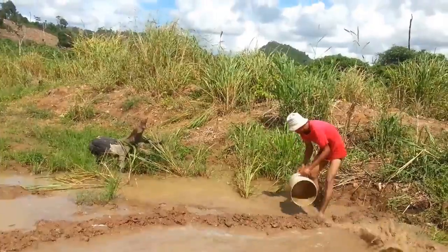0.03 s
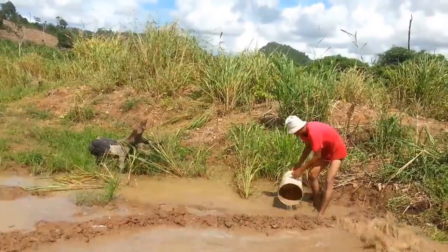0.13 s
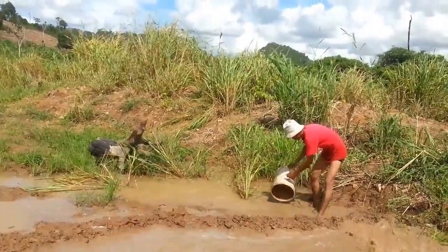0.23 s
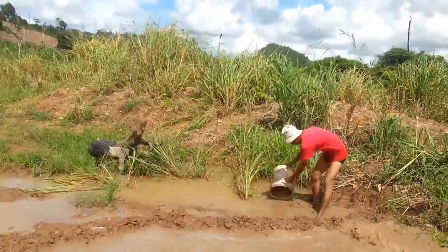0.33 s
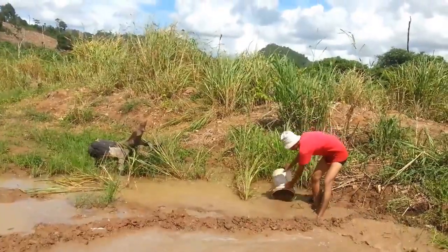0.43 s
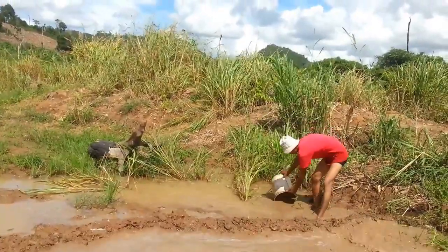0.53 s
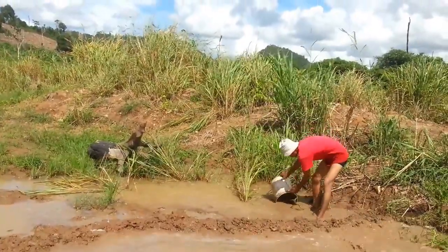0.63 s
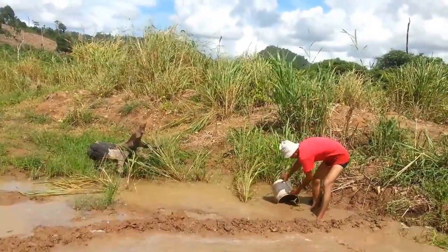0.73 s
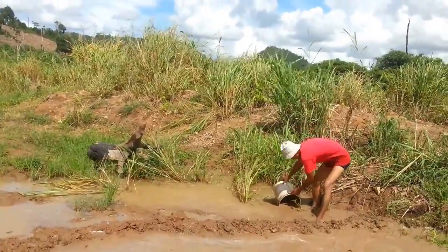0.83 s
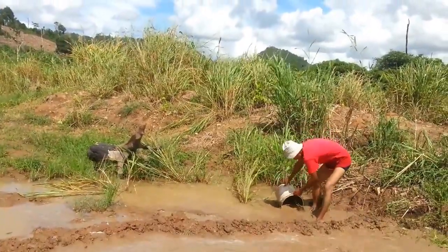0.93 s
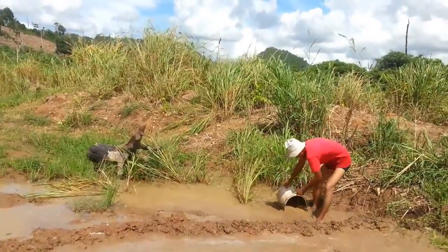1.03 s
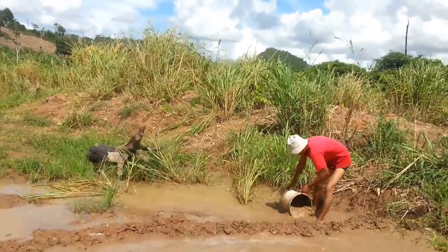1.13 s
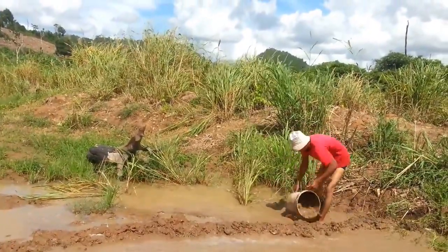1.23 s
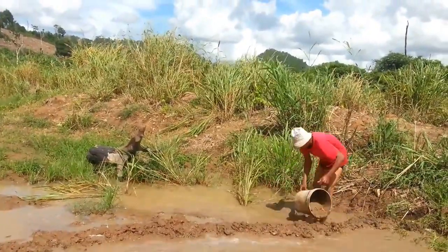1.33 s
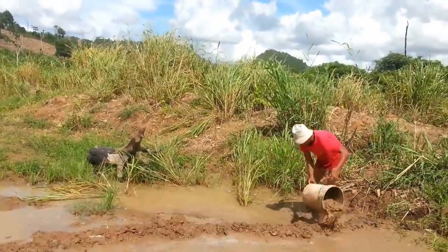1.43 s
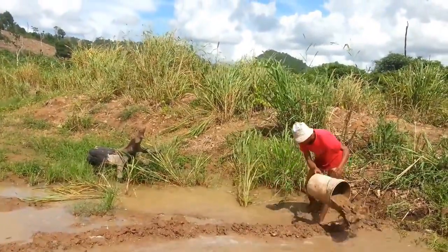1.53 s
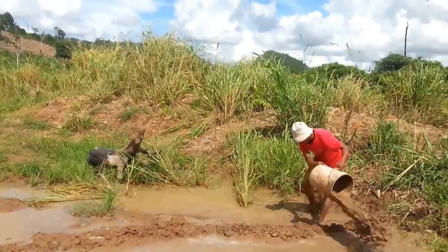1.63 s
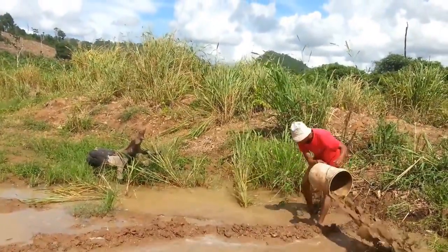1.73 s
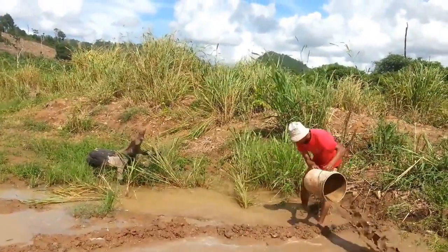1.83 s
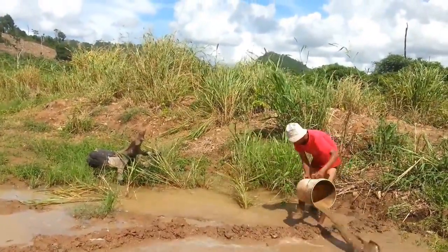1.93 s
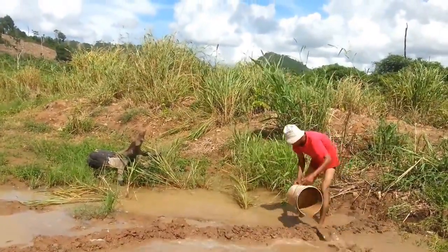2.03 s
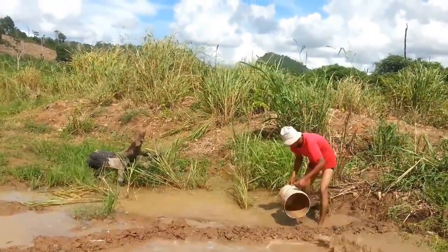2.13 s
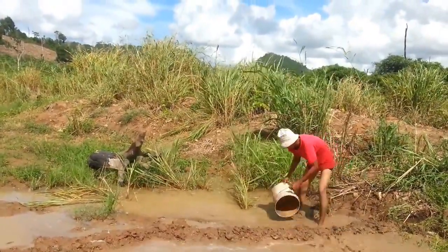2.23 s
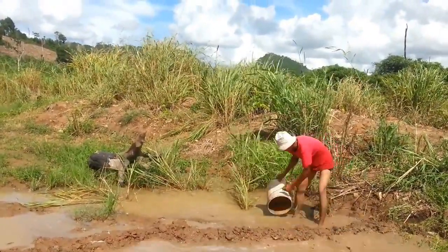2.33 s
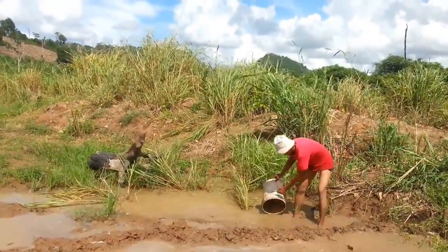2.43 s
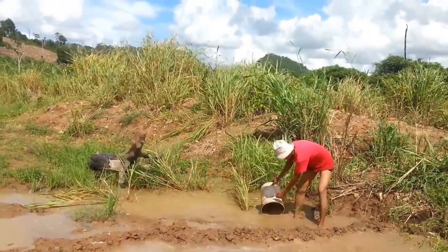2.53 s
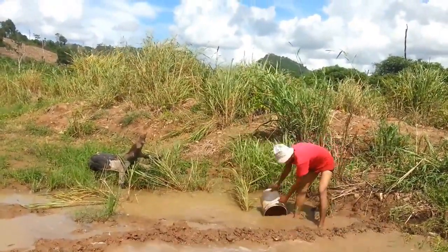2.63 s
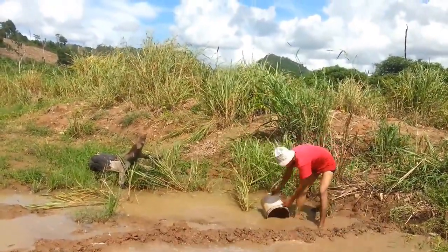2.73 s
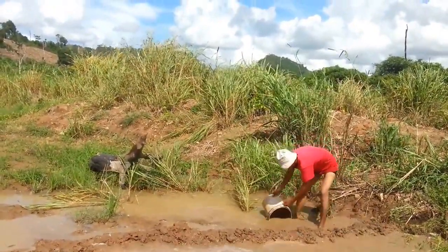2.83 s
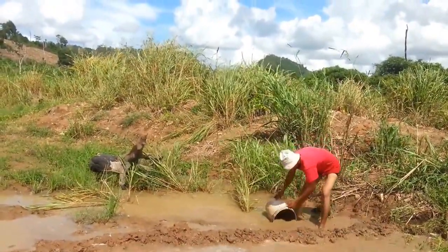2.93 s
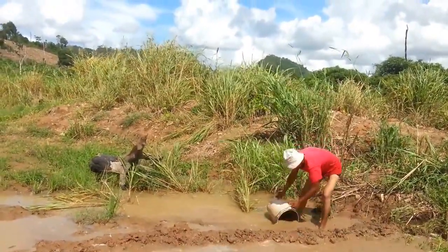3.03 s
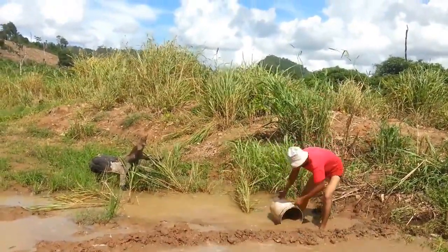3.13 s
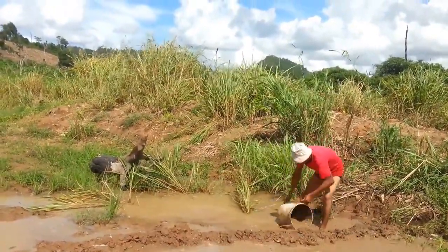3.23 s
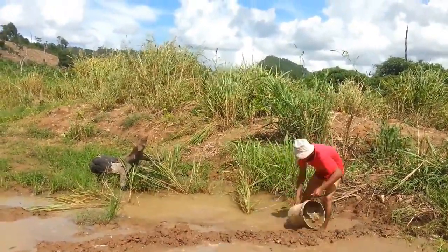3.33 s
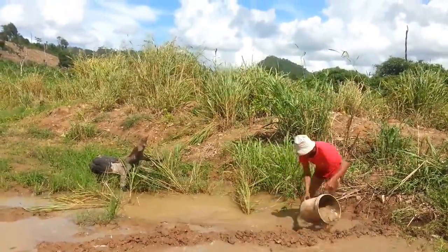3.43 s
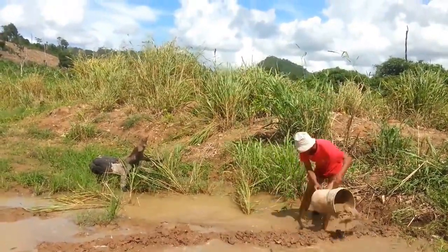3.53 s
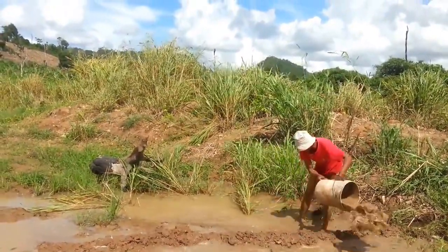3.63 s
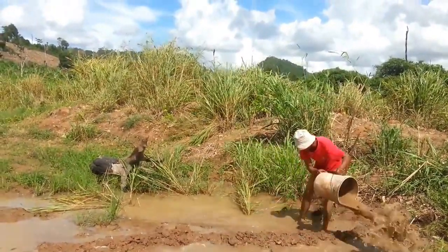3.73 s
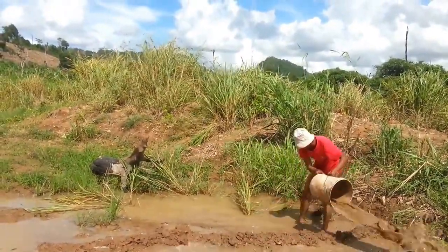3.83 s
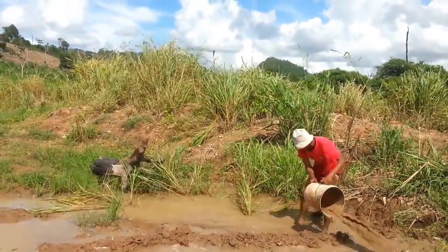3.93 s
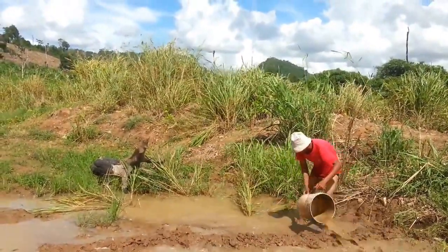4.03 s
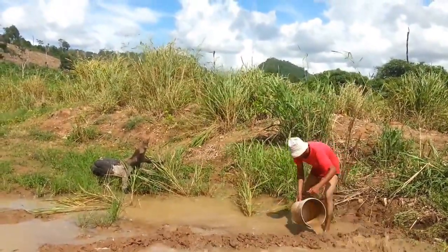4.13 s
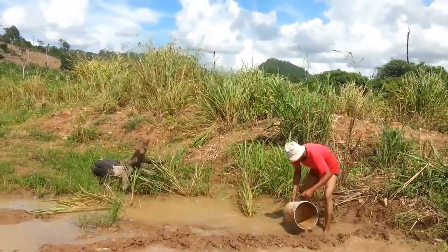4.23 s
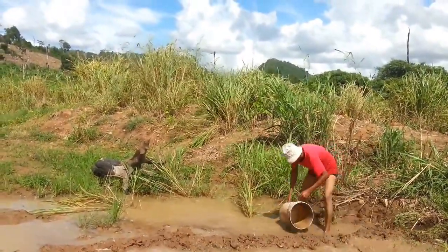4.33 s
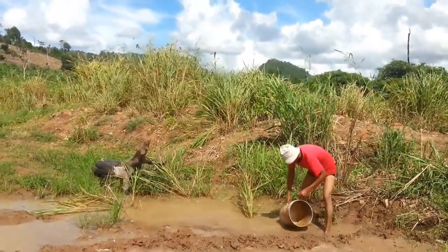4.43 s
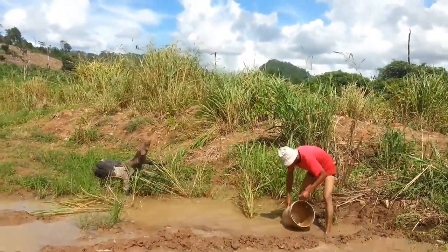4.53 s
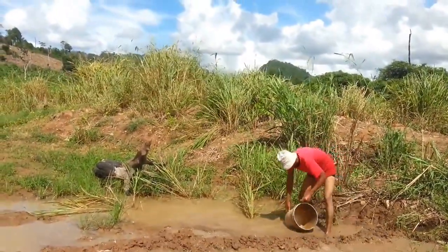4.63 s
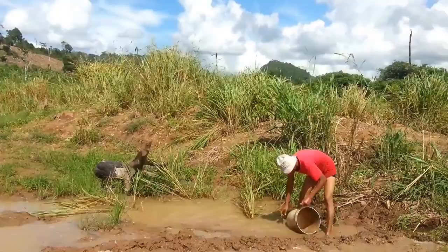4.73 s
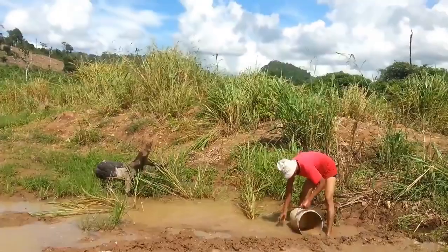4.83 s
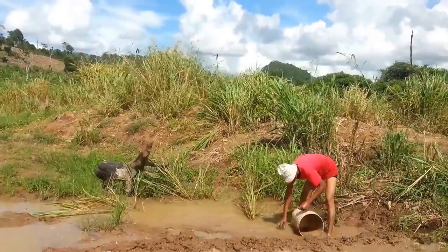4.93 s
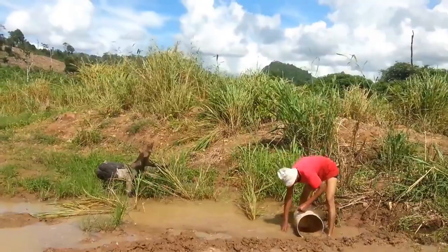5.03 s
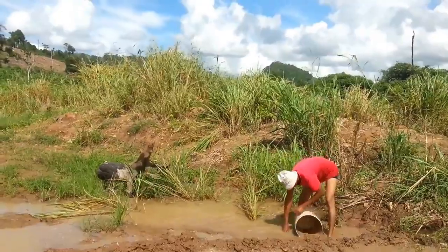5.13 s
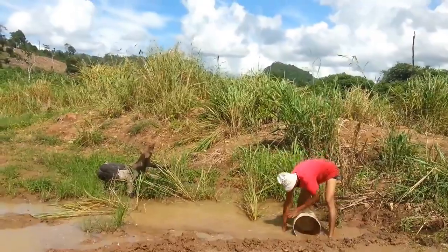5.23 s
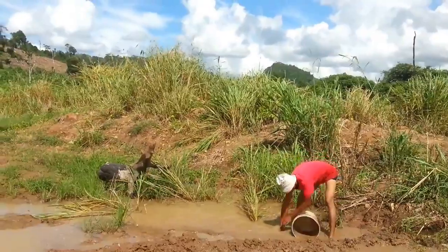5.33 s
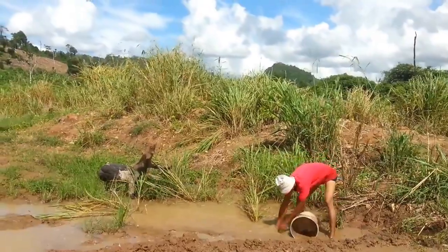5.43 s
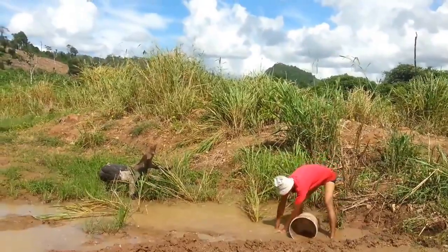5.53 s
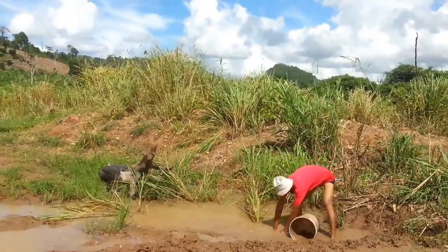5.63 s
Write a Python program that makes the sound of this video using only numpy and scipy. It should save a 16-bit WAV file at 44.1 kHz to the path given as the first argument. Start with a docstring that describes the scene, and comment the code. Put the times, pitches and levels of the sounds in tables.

```python
"""A plastic bucket scoops muddy water from a shallow ditch and throws it onto a flooded field three times.
The first throw lands at once, the others near 1.9 and 4.1 s: random bubbles, noise and plops, then run-off.
Falling sine notes of two birds come at 0.8 s and, lower, at 4.8 s; an insect's pulsed noise buzzes from 5.1 s.
Sloshes, drips and a trickle fill the gaps, over filtered noise for the field's hiss and a low rumble.
Two microphone ports on opposite faces of a small camera hear it with their own colour and lag."""
import sys
import numpy as np
from scipy import signal
from scipy.fft import rfft, irfft, next_fast_len
from scipy.io import wavfile
from scipy.ndimage import uniform_filter1d, map_coordinates

SR = 44100
rng = np.random.default_rng(int(sys.argv[2]) if len(sys.argv) > 2 else 0)


def unload_audio(sound):
    """Save the sound as a 16-bit wav file, at the path given as the first command line argument."""
    columns = np.transpose(np.atleast_2d(sound))
    # keep every value between -1 and 1, then stretch to whole-number steps
    steps = np.round(np.clip(columns, -1, 1) * 32767)
    wavfile.write(sys.argv[1], SR, steps.astype(np.int16))


def attenuation_scalar(level_db):
    """Turn a level in dB into a linear amplitude multiplier (20 dB per decade)."""
    decades = np.asarray(level_db, float) / 20
    return 10 ** decades


N = 250488  # length [samples]
TIME = np.arange(N) / SR  # [s]
# Source levels below are those before the ports and the camera body colour them.


def unit(x):
    """Normalisation: the signal is scaled to rms 1."""
    return x / np.sqrt(np.mean(x ** 2) + 1e-20)


def along(points, hz, axis=1):
    """Logarithmic frequency scale: one column of a table is interpolated along it."""
    table = np.transpose(points)
    return np.interp(np.log(hz + 1), np.log(table[0] + 1), table[axis])


def filtered(x, response):
    """Linear filtering: the spectrum is multiplied by a complex response of frequency."""
    size = next_fast_len(N + 8192)
    spectrum = rfft(x, size) * response(np.fft.rfftfreq(size, 1 / SR))
    return irfft(spectrum, size)[..., :N]


def band(hz, low_hz, high_hz):
    """Band-pass response: the gain falls smoothly beyond each edge."""
    return 1 / np.sqrt((1 + (low_hz / (hz + 1)) ** 6) * (1 + (hz / high_hz) ** 6))


def swell(peak_s, rise_s, fade_s):
    """Exponential growth and decay: dB climb 20 in rise_s up to the peak and drop 20 in fade_s after it."""
    late = TIME - peak_s
    return -20 * np.maximum(late / fade_s, -late / rise_s)


def bubbles(start, hz, size, cycles, rise, count, swell=7.9):
    """Bubble resonance: air pockets swell, ring with rising pitch and die away.

    Row two is the same ring a quarter turn away; count is the length in samples."""
    t = np.arange(count) / SR
    age = t * (hz / cycles)[:, None]
    start_turn = rng.random((len(hz), 1))
    phase = 2 * np.pi * (hz[:, None] * t * (1 + rise * np.minimum(age, 3) / 2) + start_turn)
    envelope = size[:, None] * (1 - np.exp(-swell * age)) * np.exp(-age * np.sqrt(age))
    flip = rng.choice([-1, 1], (len(hz), 1))
    where = (np.round(start * SR).astype(int)[:, None] + np.arange(count)).ravel()
    waves = (np.sin(phase), flip * np.cos(phase))
    return np.array([np.bincount(where, (envelope * wave).ravel(), N + count)[:N] for wave in waves])


LANDING_RISE_S = 0.0649  # to swell 20 dB, for landings and run-off alike
# lumps of thrown water landing: (peak time [s], time to fade 20 dB [s], heave [dB], gurgle [dB], spray [dB])
LUMPS = [(0.116, 0.12, -25.5, -23, -20), (.22, 0.057, -30.5, -26.5, -34), (1.943, 0.31, -48, -23.5, -21),
         (2.015, 0.16, -24, -21, -28), (2.168, 0.2861, -32, -26.5, -26), (4.056, 0.46, -60.5, -29.5, -22.5),
         (4.136, 0.0859, -16.5, -18.5, -22), (4.29, 0.19, -35, -30, -53.5)]


def landings():
    """Impact of a liquid mass: each landing swells quickly and decays exponentially in three bands."""
    return [np.c_[levels] + swell(s, LANDING_RISE_S, fade) for s, fade, *levels in LUMPS]


# water draining away after each throw:
# (peak time [s], level [dB], fall before the speed factor [dB/s], time it runs dry [s])
DRAINING = [(.01, -31, 12.5, 0.6499), (1.95, -30, 16.5, 2.7642), (4.074, -29.5, 22.5, 4.5)]
# rows heave, gurgle, spray: (level over the run-off [dB], speed factor of its fall [ratio])
DRAINING_COLOUR = [(-2, 2.6374), (-0.37, 0.996), (-1, 0.96)]


def runoff():
    """Draining flow: the level falls steadily in dB, each band at its own speed, until the water runs dry."""
    dry_fade_s = 0.08  # to lose 20 dB more once dry
    moves = []
    for s, db, fall, dry_s in DRAINING:
        running_dry = swell(dry_s, np.inf, dry_fade_s)
        moves.append([db + over + swell(s, LANDING_RISE_S, 20 / (fall * speed)) + running_dry
                      for over, speed in DRAINING_COLOUR])
    return moves


# bucket and feet stirring the ditch:
# (peak time [s], time to fade 20 dB [s], heave [dB], gurgle [dB], spray [dB]);
# a negative fade exchanges the rise and fade times, zero is silent
STIRRING = [(.33, 0.15, -34, -38, -44), (.71, 0.26, -54, -45, -40), (0.811, -0.01, -50, -29, -35),
            (1.27, 0.1851, -48, -56, -38.5), (1.37, 0.0583, -50, -45, -36),
            (1.495, 0.2336, -47, -38.5, -35), (1.86, -0.05, -48.5, -52.5, -36), (1.915, 0, -53, -32, -26),
            (2.87, 0.12, -44, -46, -64), (2.939, 0.09, -46.5, -39.5, -36), (3.31, 0.05, -49, -58.5, -42),
            (3.409, 0.14, -50, -40, -35.5), (3.47, 0.04, -42, -41, -38), (3.619, 0.16, -42, -34.5, -32),
            (3.811, 0.2, -53, -45, -44.5), (4.9, 0.52, -71, -49, -46), (5.5, 0.1893, -49, -47, -54.5)]


def sloshes():
    """Forced motion of a liquid: each slosh rises nearly as slowly as it dies away."""
    rise_over_fade = 0.97
    return [np.c_[levels] + swell(s, rise_over_fade * fade, fade) for s, fade, *levels in STIRRING]


# the ditch trickling throughout: (time [s], level [dB])
DITCH = [(0, -41.5), (1.15, -45.5), (1.8, -46.5), (2.85, -45.5), (3.24, -49), (3.95, -53.5), (4.7, -48.5),
         (5.68, -48.5)]
# level over the trickle [dB] of heave, gurgle, spray
DITCH_COLOUR = [-10, -1.5, -1.4]


def trickle():
    """Steady flow: one slowly varying level sets all three bands."""
    return [np.interp(TIME, *np.transpose(DITCH)) + np.c_[DITCH_COLOUR]]


def motion():
    """Incoherent addition: the powers of all movements add up to levels in dB of heave, gurgle and spray."""
    moves = trickle() + landings() + sloshes() + runoff()
    return 10 * np.log10(sum(attenuation_scalar(db) ** 2 for db in moves))


# colour of splashing water: (frequency [Hz], gain [dB])
SPLASH_COLOUR = [(80, -41.5), (250, -15.5), (400, -10.5), (600, -1.5), (1200, -2), (1750, 3), (2200, -3),
                 (2800, -9), (3700, -5.5), (4400, -11), (4900, -14.5), (5500, -9.5), (6000, -14.5),
                 (6800, -16), (8000, -17), (10500, -24), (12000, -22.5), (14000, -23)]


def crowd(low_hz, high_hz, cycles, spread_db, smooth, count, size):
    """Superposition: many random bubbles, a few louder if spread, over the rush of those too small to part."""
    when, where, loud = rng.random((count, 3)).T
    hz = low_hz / 1.279 * (1.6906 * high_hz / low_hz) ** where
    strength = hz * attenuation_scalar(-spread_db * np.log(loud + 0.01656))
    pops = unit(bubbles(when * N / SR, hz, strength, cycles, rise=0.1532, count=size))
    mix = pops + smooth * rng.standard_normal((2, N))
    return unit(filtered(mix, lambda f: attenuation_scalar(along(SPLASH_COLOUR, f)) * band(f, low_hz, high_hz)))


# thin sheets of water tearing off the rim:
# (peak time [s], time to swell or fade 20 dB [s], level [dB]); the sign of the second has no effect
RIM_SHEETS = [(1.87, -0.9, -42.5), (3.99, 0.1, -43)]


def sheets():
    """Break-up of a liquid sheet: the power of its fine hiss swells and fades evenly about a peak."""
    return sum(attenuation_scalar(db + swell(s, fade, fade)) ** 2 for s, fade, db in RIM_SHEETS)


def water(heave_db, gurgle_db, spray_db):
    """Band-wise modulation: heaving mass, gurgle, spray and mist follow the water's motion, in clumps."""
    mist_db = spray_db - 6.0 + 0.16 * (spray_db + 30.0)  # the harder the splash, the finer it breaks up
    mist_db = 10 * np.log10(attenuation_scalar(mist_db) ** 2 + sheets())
    # smooth random level changes in dB, drawn 45 times a second
    points = 0.9 * rng.standard_normal((4, 300)).ravel()
    clumps = map_coordinates(points, [TIME * 45 + [[0], [300], [600], [900]]])
    heave = crowd(145.0, 790.0, cycles=2.83, spread_db=1.6, smooth=1.1, count=4000, size=900)
    gurgle = crowd(781.95, 2240.0, cycles=4.4, spread_db=1.5, smooth=1.1, count=8000, size=500)
    spray = crowd(2284.0, 6310.0, cycles=9.2, spread_db=0.0, smooth=1.3, count=10000, size=300)
    mist = crowd(6200.0, 14640, cycles=5.26, spread_db=0.5, smooth=1.68, count=16000, size=120)
    return (attenuation_scalar(heave_db + clumps[0]) * heave + attenuation_scalar(gurgle_db + clumps[1]) * gurgle
            + attenuation_scalar(spray_db + clumps[2]) * spray + attenuation_scalar(mist_db + clumps[3]) * mist)


# large bubbles and slaps:
# (time [s], ring level [dB], starting pitch [Hz], slap level over the ring before colouring [dB])
LARGE_BUBBLES = [(0.073, -19, 1140, 5.5), (0.088, -10, 1177, 2.5), (0.107, -8.5, 1278, -6),
                 (0.196, -16, 845, -1.5), (0.442, -28, 1119, -11), (0.585, -27, 1070, -9),
                 (0.629, -29, 655, 0), (0.708, -27, 590, 0), (0.741, -28.5, 1277, 4),
                 (0.791, -24, 997, 4.5), (0.887, -30.5, 700, -8), (1.129, -26.5, 540.6, -7),
                 (1.254, -25, 1242, 1), (1.438, -22, 1558, 2.5), (1.492, -24, 1115, 0),
                 (1.512, -29, 1050, -7.5), (1.737, -26.5, 1921, -5), (1.78, -24, 1325, -19.5),
                 (1.792, -26.5, 1610, -6.5), (1.868, -27, 1241, -12), (1.902, -14, 1750, -5.5),
                 (1.931, -8, 1772, -24), (1.941, -6, 1750, 0), (1.949, -7, 667, 4), (1.965, -5, 1690, -5),
                 (2.145, -13.5, 1035, 6), (2.528, -24, 1605, -17), (2.562, -27, 1300, -3),
                 (2.633, -26, 1200, 0.5), (2.715, -23, 1690, -3), (2.868, -30, 547, 3),
                 (2.888, -29, 556, 4), (2.914, -23, 564, 7), (2.9125, -15.5, 1140, 4),
                 (3.249, -27.5, 1540, -6), (3.333, -22, 1583, 2), (3.379, -13.5, 1770, -5.5),
                 (3.394, -25, 661, -4.5), (3.614, -22, 1742, 2.5), (3.644, -19, 1349, -0.5),
                 (3.678, -17.5, 1750, -19), (3.71, -23, 573, 0), (4.049, -27, 1220, 18.5),
                 (4.126, -3, 798.6, -10), (4.146, -4, 567, -9), (4.159, 1, 598.5, -8),
                 (4.795, -35, 800, -8), (4.826, -28.5, 1605, -7), (4.867, -32, 1770, -10.5),
                 (4.929, -29, 819.8, 10), (4.981, -32, 1208, -6), (5.109, -31, 1140, 2),
                 (5.213, -32.5, 640, -15), (5.406, -24.5, 1750, -4.5), (5.44, -28.5, 1038, 2.5),
                 (5.486, -32, 790, -3.5)]


def plops():
    """Entrained-air resonance: each large bubble rings at its own pitch with the wet slap that traps it."""
    s, db, hz, slap_db = np.transpose(LARGE_BUBBLES)
    ring = bubbles(s, hz, attenuation_scalar(db), cycles=3.86, rise=0.01608, count=1500, swell=3.22)
    attack_s, t60_s = 0.000715, 0.08
    t = np.arange(2000) / SR
    slap = np.zeros((2, N + 2000))
    for at, peak_db in zip(s, db + slap_db):
        envelope = (1 - np.exp(-t / attack_s)) * attenuation_scalar(peak_db - 60 * t / t60_s)
        slap[:, round(at * SR):][:, :2000] += envelope * rng.standard_normal((2, 2000))
    return ring + filtered(slap[:, :N], lambda f: attenuation_scalar(along(SPLASH_COLOUR, f)) / np.sqrt(1 + (f / 3600) ** 2))


# hollow pockets of air in the bucket and under the feet: (time [s], level [dB], starting pitch [Hz])
HOLLOWS = [(0.105, -20, 365.5), (0.34, -30, 314), (0.604, -37, 258), (1.247, -31.5, 258.4),
           (1.508, -33.5, 306.6), (1.625, -32.5, 234.9), (1.691, -35.5, 284.4), (2.002, -28, 329),
           (3.62, -31.5, 320), (4.076, -26, 368), (4.156, -9.5, 357.3)]


def gulps():
    """Low-frequency bubble resonance: big pockets ring briefly, each with another breaking off just after."""
    s, db, hz = np.transpose(HOLLOWS)
    late, off = rng.random((len(s), 2)).T
    first = bubbles(s, hz, attenuation_scalar(db), cycles=2.2, rise=0.012, count=3500, swell=5.015)
    second_s = s + 0.00773 + 0.0149 * late
    second_hz = hz * (0.843 + 0.81 * off)
    second = bubbles(second_s, second_hz, attenuation_scalar(db - 2.0), cycles=2.06, rise=0.066, count=3500, swell=5.7)
    return first + second


# single drops striking: (time [s], level before the burst is scaled by a third [dB], central pitch [Hz])
STRIKES = [(0.109, -9.5, 4437), (0.2242, -12, 2720), (0.709, -16, 4522), (0.806, -21, 3800),
           (0.953, -27, 5815), (1.2547, -18.5, 3760), (1.3377, -15.5, 3674), (1.3799, -24.5, 4781),
           (1.454, -19.5, 3945), (1.4847, -18.5, 2766), (1.9015, -21, 3767), (2.94, -23.5, 7028),
           (3.003, -26, 5620), (3.1033, -28.5, 7238), (3.2883, -26, 3844), (3.4033, -28.5, 5360),
           (4.0592, -8.5, 5195), (4.1038, -10, 5207), (4.5883, -20.5, 6770), (4.888, -31, 4570),
           (5.049, -29.5, 3200)]


def drops():
    """Drop impact: each bursts as twelve tiny bubbles scattered in time and about one high pitch."""
    s, db, hz = np.transpose(STRIKES)
    scatter = rng.standard_normal((len(s), 2, 12))
    burst = 0
    for late, off in scatter.T:
        burst = burst + bubbles(s + 0.003 * abs(late), hz * np.exp(0.07 * off), attenuation_scalar(db),
                                cycles=4, rise=0.03, count=300)
    return burst / 3


# clear drips: (time [s], level [dB], starting pitch [Hz])
DRIPS = [(0.4411, -25, 2660), (0.9291, -30.5, 2702), (1.063, -37, 2711), (2.938, -31.5, 1163),
         (3.371, -21, 1794), (5.281, -37, 1690)]


def plinks():
    """Lightly damped resonance: drips into still water ring long and clear."""
    s, db, hz = np.transpose(DRIPS)
    return bubbles(s, hz, attenuation_scalar(db), cycles=15.5, rise=0.0077, count=1500, swell=5.61)


def strays(level_db, over_db, low_hz, high_hz, cycles, swell, count):
    """Masking: small plops or droplets at chance moments stand out most where the water is calm."""
    when, where, loud = rng.random((count, 3)).T
    hz = low_hz * (high_hz / low_hz) ** where
    around_db = level_db[(when * N).astype(int)]
    drowned_db = 0.35 * (around_db - level_db.min())  # share of the rising water that drowns them
    db = around_db - drowned_db + over_db + 6 * loud
    return bubbles(when * N / SR, hz, attenuation_scalar(db), cycles=cycles, rise=0.05, count=1500, swell=swell)


# falling notes of two birds, one near 6.5 kHz, a lower one at 4.8 s:
# (time [s], length [s], start pitch [Hz], end pitch [Hz], level before flutter and panning [dB])
NOTES = [(.82, 0.0246, 6669, 6409, -49), (0.864, 0.02176, 6659, 6388, -49.5),
         (0.904, 0.02126, 6690, 6340, -48), (0.94, 0.0442, 6998, 6305, -44),
         (0.995, 0.037, 7220, 6250, -42), (1.055, 0.0374, 7010, 6420, -44), (4.788, 0.019, 3250, 3000, -38),
         (4.856, 0.022, 3300, 2943, -42)]


def birds():
    """Frequency modulation: short whistles fall ever faster and flutter in the moving air, off to the right."""
    out = np.zeros(N)
    for s, length, start_hz, end_hz, db in NOTES:
        u = np.linspace(0, 1, round(length * SR))
        hz = start_hz + (end_hz - start_hz) * u ** 1.38
        envelope = attenuation_scalar(db) * np.sqrt(np.sin(np.pi * u).clip(0))
        out[round(s * SR):][:len(u)] += envelope * np.sin(2 * np.pi * np.cumsum(hz) / SR)
    flutter = attenuation_scalar(2.5 * unit(uniform_filter1d(rng.standard_normal(N), size=150)))  # 2.5 dB rms
    return out * flutter * attenuation_scalar([[-12], [0]])


# buzzes of an insect: (start time [s], end time [s], level before the strokes and panning [dB])
BUZZES = [(5.065, 5.25, -58), (5.29, 5.345, -57)]


def insect():
    """Amplitude modulation: 70 strokes a second turn narrow-band noise into a high rasp, off to the left."""
    rasp = unit(filtered(rng.standard_normal(N), lambda f: np.exp(-((f - 12100) / 600) ** 2)))
    strokes = 1 + 1.23 * np.sin(2 * np.pi * 70 * TIME)
    level = sum(attenuation_scalar(db) * ((TIME > start) & (TIME < end)) for start, end, db in BUZZES)
    return uniform_filter1d(level, size=200) * strokes * rasp * attenuation_scalar([[0], [-15]])


# colour of the background: (frequency [Hz], gain [dB])
FIELD_COLOUR = [(30, -20), (136, -8.5), (234, 2.5), (415, -5.5), (567, -31), (928, -47.5), (1140, -11.5),
                (1830, -31), (2190, -1), (5300, -3), (13900, -4.5)]
# a low background rumble whose level changes over time: (time [s], level [dB])
RUMBLE_LEVEL = [(0.0, -69.5), (1.36, -52.5), (2.02, -57.5), (2.36, -94.5), (2.58, -66.5), (2.82, -52.5),
                (3.32, -63.5), (3.99, -63.5), (4.22, -56), (5.68, -66.5)]


def field():
    """Filtered noise: far grass and air hiss steadily over a low rumble whose level changes over time."""
    noise = rng.standard_normal((2, 2, N))
    hiss = unit(filtered(noise[0], lambda f: attenuation_scalar(along(FIELD_COLOUR, f)) * band(f, 174.74, 14260)))
    rumble = unit(filtered(noise[1], lambda f: attenuation_scalar(along(FIELD_COLOUR, f)) * band(f, 12.47, 360.0)))
    rumble_db = np.interp(TIME, *np.transpose(RUMBLE_LEVEL))
    return attenuation_scalar(-50) * hiss + attenuation_scalar(rumble_db) * rumble


# the two microphone ports:
# (frequency [Hz], left over right [dB], likeness before nearness [0-1], left lag behind right [rad])
PORT_PAIR = [(151.8, -3.5, 0.69, 0.36), (590, -0.1813, 0.9, 0), (1200, 2.5, 0.82, 0.36),
             (1750, 5, 0.46, -0.46), (2254, -3, 0.96, 4), (2772, -6.5, 0.14, 1.5), (3420, 0, 0.61, 3),
             (4320, -1.5, 0.7, 5), (4927, -12.5, 0.7, 4.5), (5360, -8.5, 0, -2), (5840, -20.5, 0, 7),
             (6487.5, -5.5, 0, 3.5), (8200, -1, 0.05, 3.5), (10330, -3.5, 0.16, 7.5), (11900, 4, 0, 2),
             (14385, 12, 0.2, 2)]


def at_ports(pair, near):
    """Interchannel coherence: row one reaches both ports alike, row two in opposite sense."""
    def shares(f):
        likeness = np.clip(near * along(PORT_PAIR, f, axis=2), 0, 1)
        turn = np.arccos(likeness) / 2
        return np.array([np.cos(turn), np.sin(turn)])
    shared, apart = filtered(pair, shares)
    return np.array([shared + apart, shared - apart])


# cavities of the camera body: (frequency [Hz], width [Hz], lift [dB])
CAVITIES = [(540.2, 34, 5), (655, 39, 3), (845, 20, 4.5), (1140, 202, 6.5), (1637.5, 18, 3.5),
            (4932.5, 710, 8.5)]


def camera_body(dry):
    """Cavity resonance and diffraction: the body colours, shades and delays each port by pitch."""
    def ports(f):
        ratio = attenuation_scalar(along(PORT_PAIR, f)) ** 2
        share = np.sqrt(2 * np.array([ratio, np.ones_like(f)]) / (1 + ratio))
        lift_db = sum(db / (1 + (2 * (f - hz) / width) ** 2) for hz, width, db in CAVITIES)
        lag = np.exp(-0.5j * along(PORT_PAIR, f, axis=3) * np.array([[1], [-1]]))
        return attenuation_scalar(lift_db + 0.5) * share * lag * (f < 14600)  # upper limit of the sound [Hz]
    return filtered(dry, ports)


def scene():
    """Superposition: water in front, the field around; single blows reach the ports slightly more alike."""
    levels = motion()
    rush = at_ports(water(*levels), near=0.99)
    stray_plops = strays(levels[1], 7.5, 650, 2830, cycles=4.2, swell=3, count=260)
    patter = strays(levels[2], 9, 2830, 7000, cycles=3.1, swell=21.0, count=220)
    blows = at_ports(plops() + gulps() + drops() + plinks() + stray_plops + patter, near=1.073)
    return blows + rush + at_ports(field(), near=0.4) + birds() + insect()


def top_cut(x):
    """Nothing passes above the cut-off."""
    return signal.sosfilt(signal.butter(12, 15590, fs=SR, output="sos"), x)


def record(dry):
    """Quadratic distortion: loud blows push the membranes off centre, adding a low thump to both ports."""
    heard = camera_body(dry)
    thump = 0.099 * filtered(np.mean(heard, axis=0) ** 2, lambda f: band(f, 22, 75.6))
    return top_cut(np.clip(heard + thump, -1, 1))


dry = scene()
out = record(dry)
unload_audio(out)
```